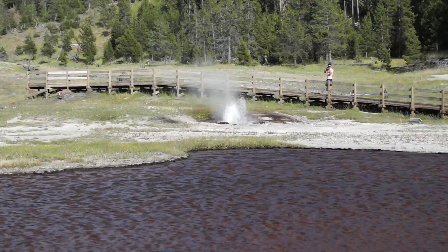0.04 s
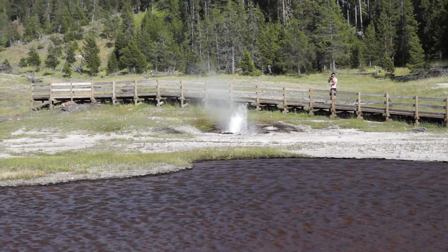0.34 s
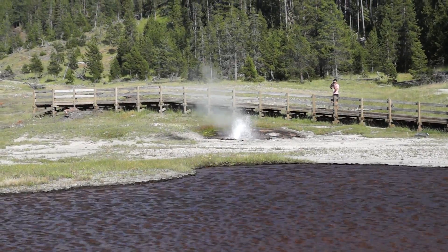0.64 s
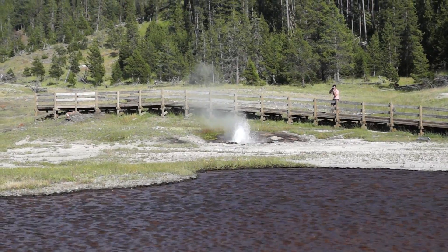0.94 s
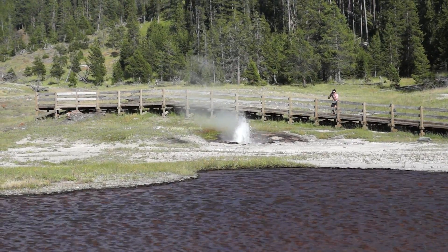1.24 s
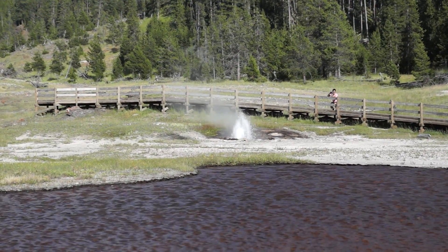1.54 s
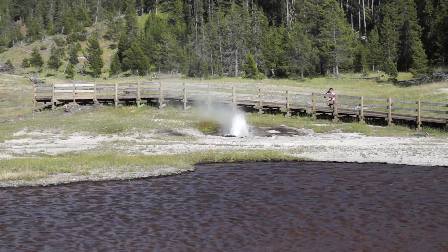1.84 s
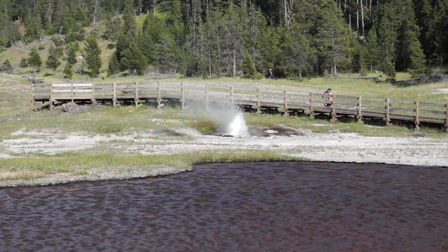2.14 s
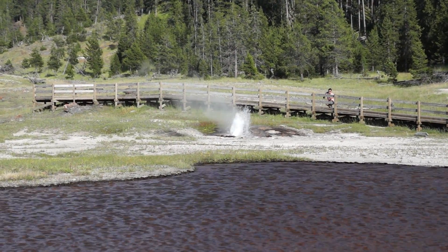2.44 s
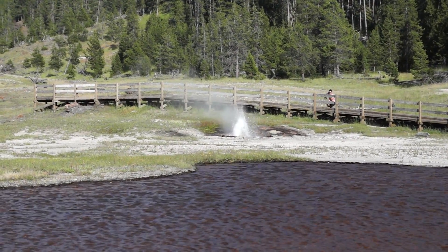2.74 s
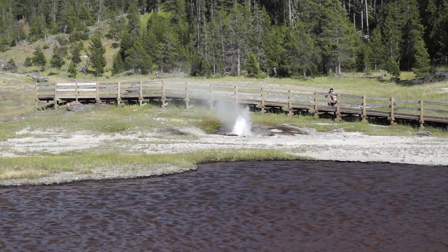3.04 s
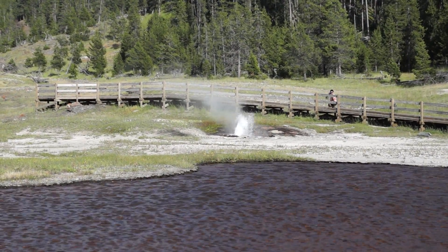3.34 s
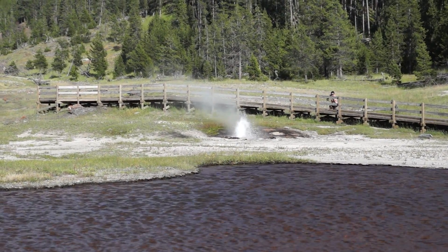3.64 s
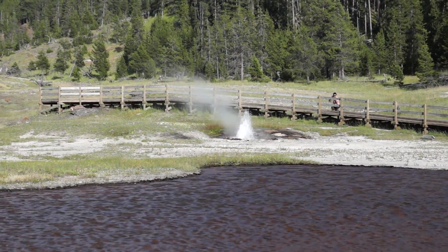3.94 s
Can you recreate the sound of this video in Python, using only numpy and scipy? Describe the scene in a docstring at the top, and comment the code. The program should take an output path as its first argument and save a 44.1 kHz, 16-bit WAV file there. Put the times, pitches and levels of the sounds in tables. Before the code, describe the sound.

Steady far rush of a small spraying geyser, with gusts rumbling on the microphone.

```python
"""A small geyser splashes steadily across a pond: drops patter faintly inside a far rush of spray,
which merges with the wind in the pines. Close by, gusts and small swirls of air buffet the microphone
of a hand-held camera. Two gusts are hard, and after each of them the whole sound is quieter.
The camera body gives two hollow knocks and a few faint ticks."""
import sys
import numpy as np
from scipy import signal
from scipy.io import wavfile
from scipy.ndimage import uniform_filter1d

SR = 44100
rng = np.random.default_rng(int(sys.argv[2]) if len(sys.argv) > 2 else 0)


def inscribe(sig):
    """Save sig as 16-bit PCM at rate SR to the path in sys.argv[1].

    A 1-D sig is mono; a 2-D sig holds one channel per row.
    Samples are clipped to [-1, 1] before scaling.
    """
    pcm = np.round(np.clip(np.atleast_2d(sig).T, -1, 1) * 32767)
    wavfile.write(sys.argv[1], SR, pcm.astype(np.int16))


N = 176400  # 4 seconds

# Faint ticks: (time [s], peak level [dB], pitch [Hz], width to each side [octaves], left over right [dB])
TICKS = [(.453, -42, 5900, .1, 0), (.5185, -35, 5900, .1, -3), (0.518, -31, 13000, 0.16, -7),
         (.765, -37, 13200, .3, -2), (1.753, -26, 2370, 0.17, 2), (1.815, -32, 3270, 0.23, -4),
         (1.899, -34, 3300, 0.18, -4), (1.943, -30.5, 2900, 0.13, -7), (2.069, -34, 5070, 0.16, 0),
         (2.111, -39, 7000, 1.0, 4), (2.16, -34.5, 3380, 0.088, 10), (3.224, -33, 6000, 0.31, 3),
         (3.2625, -24.5, 3170, 0.31, 6), (3.316, -24.5, 2300, 0.34, 9), (3.544, -32, 3400, 0.31, -6)]
# Knocks on the camera body: (time [s], peak level [dB], main pitch [Hz])
KNOCKS = [(0.3367, -17.5, 690), (1.4054, -13, 1150)]
# The tones the body rings with: (pitch [times the main pitch], level [dB], time to fade by 60 dB [s])
BODY_TONES = [(.44, -9, 0.033), (.8, -8, 0.026), (1, 7, 0.019), (1.55, -5, 0.013), (2.7, -27, 0.0078)]

# How hard the wind blows on the microphone: (time [s], level [dB])
WIND_LEVEL = [(.05, -53.5), (.24, -65), (.29, -38), (.38, -57), (.49, -48), (.525, -38), (.58, -48.5),
              (.76, -35), (.86, -38.5), (.91, -29), (.94, -35), (1.0, -32.5), (1.05, -40), (1.25, -58.5),
              (1.93, -55), (1.97, -36.5), (1.995, -21.5), (2.02, -27), (2.055, -19), (2.12, -20.5),
              (2.155, -23.5), (2.22, -23.5), (2.275, -21.5), (2.295, -33.5), (2.45, -38.5), (2.53, -55),
              (2.66, -30.5), (2.69, -39), (2.74, -29.5), (2.81, -31), (2.92, -40), (2.99, -33), (3.06, -50),
              (3.16, -48), (3.216, -30.5), (3.241, -12), (3.295, -19.5), (3.336, -10), (3.37, -14.5),
              (3.51, -23.5), (3.545, -27), (3.63, -29), (3.66, -38), (3.72, -50.5), (4.0, -52)]
# The rumble of a light breeze: (frequency [Hz], relative level [dB])
BREEZE_SPECTRUM = [(25, -37), (60, -16), (110, -2.5), (200, -0.5), (320, -3.5), (550, -12.5), (1000, -15.5),
                   (3000, -55)]
# The brighter sound of a hard gust: (frequency [Hz], relative level [dB])
GUST_SPECTRUM = [(25, -37), (60, -27.5), (115, -14), (250, -4.5), (400, -7.5), (600, -15.5), (1060, -27.5),
                 (1500, -31.5), (2400, -44), (4500, -54)]
# How alike the wind is on the left and right: (frequency [Hz], likeness [-1 to 1])
WIND_LIKENESS = [(60, 0.85), (130, 0.88), (290, 0.62), (640, 0.28), (1400, -0.36)]
# Swirls of air: (time [s], level at the crest [dB], pitch [Hz], width to each side [octaves], length [s])
SWIRLS = [(.912, -25, 235, 0.83, 0.023), (.960, -25.5, 242, 0.48, 0.019), (.991, -23, 215, 0.96, 0.024),
          (1.992, -13.5, 113, 1.74, 0.0085), (2.113, -18, 305, 1, 0.028), (2.180, -16.5, 302, 0.62, 0.017),
          (2.214, -12, 243, 0.97, 0.014), (2.237, -16.5, 356, 0.78, 0.025), (2.266, -15, 270, 0.75, 0.018),
          (2.282, -13, 300, 0.73, 0.0079), (2.797, -27.5, 218, .7, 0.013), (3.195, -31.5, 237, 0.88, 0.022),
          (3.231, -15.5, 380, 0.48, 0.011), (3.243, -14, 220, 1.2, 0.017), (3.315, -6, 375, .9, 0.01),
          (3.323, -11, 226, 1.13, 0.008), (3.383, -11.5, 360, 0.92, .016),
          (3.452, -15.5, 335, 1.27, 0.0097), (3.479, -12.5, 370, 0.74, 0.017), (3.505, -13, 320, 0.9, .013),
          (3.523, -14, 310, 0.6, .014), (3.584, -22, 261, 0.86, 0.014), (3.625, -16.5, 285, 0.74, 0.016)]

# The rush of the geyser and the pines: (frequency [Hz], relative level [dB])
RUSH_SPECTRUM = [(30, -48), (60, -27), (110, -7), (190, -9.5), (238, 4), (280, -8), (325, 7.5), (375, -7.5),
                 (430, 1), (490, 0), (590, -2.5), (780, -.5), (1080, 3.5), (1300, -4), (1550, -8.5),
                 (1850, -4.5), (2200, -7), (2600, -12), (3300, -16), (4500, -19.5), (6300, -24.5),
                 (8200, -26.5), (10000, -30), (13500, -32.5), (15800, -34.5)]
# How alike the rush is on the left and right: (frequency [Hz], likeness [-1 to 1])
RUSH_LIKENESS = [(100, 0.98), (330, 0.92), (700, 0.79), (1050, 0.81), (1550, 0.32), (2050, 0.88),
                 (2700, .66), (3400, 0.19), (4500, .46), (5800, 0.13), (15000, 0)]
# How far the rush leans to the left: (frequency [Hz], left over right [dB])
RUSH_LEAN = [(130, -2), (300, 1.5), (640, 2), (1200, .3), (3100, 0), (5500, 2.5), (8200, 5), (12000, .8)]

# Sudden drops that creep back, applied on top of all other levels: (time [s], level change [dB])
LEVEL_DROPS = [(2.115, 0), (2.12, -4), (2.17, -2.6), (3.24, -1.2), (3.25, -5.4), (3.33, -6.1), (3.345, -10),
               (3.44, -4.7), (4.0, -3.6)]


def from_db(db):
    """Turn decibels into a number to multiply a sound by."""
    return 10 ** (np.asarray(db) / 20)


def rms_one(x):
    """Scale a signal so that its average strength (rms) is 1."""
    return x / np.sqrt(np.mean(x ** 2) + 1e-20)


def at_hz(table, hz):
    """Read a table at any frequency, with octaves evenly spaced."""
    freqs, values = np.transpose(table)
    return np.interp(np.log(hz), np.log(freqs), values)


def pan(lean_db):
    """Left and right gains; a positive lean makes the left louder."""
    return from_db(np.array([[.5], [-.5]]) * lean_db)


def drift(rate_hz):
    """A smooth random wander, about 1 in size; a higher rate wanders faster."""
    step = 40  # samples between random values
    r = np.exp(-2 * np.pi * rate_hz * step / SR)
    slow = signal.lfilter([1], [1, -2 * r, r * r], rng.standard_normal(N // step + 2002))[2000:]
    return np.interp(np.arange(N) / step, np.arange(len(slow)), rms_one(slow))


def band(x, low_hz, high_hz, order=2):
    """Keep the part of a sound between two frequencies."""
    sos = signal.butter(order, [low_hz, min(high_hz, .45 * SR)], "band", fs=SR, output="sos")
    return signal.sosfilt(sos, x)


def around(x, hz, octaves, order=2):
    """Keep the part of a sound within some octaves of a pitch."""
    reach = 2 ** octaves
    return band(x, hz / reach, hz * reach, order)


def ring(clicks, hz, fade_s):
    """Each click starts a tone that fades by 60 dB in fade_s."""
    r = np.exp(-np.log(1000) / (fade_s * SR))
    angle = 2 * np.pi * hz / SR
    return signal.lfilter([0, np.sin(angle)], [1, -2 * r * np.cos(angle), r * r], clicks + 1e-18)


def add(out, time_s, peak_db, sound):
    """Mix a short sound in at a time and peak level."""
    start = int(time_s * SR)
    scaled = from_db(peak_db) * sound / np.abs(sound).max()
    out[:, start:start + sound.shape[-1]] += scaled[..., :N - start]


def noise_bands(edges_hz, likeness):
    """Give the centre frequency and stereo noise of each band in turn."""
    white = rng.standard_normal((2, 2, N))
    for k, (low, high) in enumerate(zip(edges_hz, edges_hz[1:])):
        shared, side = band(white[k % 2], low, high, order=3)
        hz = np.sqrt(low * high)
        alike = at_hz(likeness, hz)
        yield hz, np.sqrt(1 + alike) * shared + np.sqrt(1 - alike) * np.array([side, -side])


def knocks_and_ticks(fade_s=.007, snap_db=-14.5, snap_pitch_ratio=2.2):
    """A fingertip makes the camera body ring, with a dry snap; ticks are tiny bursts of noise."""
    out = np.zeros((2, N))
    click = signal.unit_impulse(SR // 10)
    fade = np.exp(-np.log(1000) * np.arange(len(click)) / SR / fade_s)
    for time_s, db, hz in KNOCKS:
        body = sum(from_db(tone_db) * ring(click, hz * ratio, ring_s)
                   for ratio, tone_db, ring_s in BODY_TONES)
        add(out, time_s, db, band(body, 420, 2300, order=3))  # the range a soft fingertip sets ringing
        burst = rng.standard_normal(len(click)) * fade
        add(out, time_s, db + snap_db, around(burst, hz * snap_pitch_ratio, octaves=.63, order=3))
    for time_s, db, hz, octaves, lean_db in TICKS:
        burst = rng.standard_normal((2, len(click))) * fade
        add(out, time_s, db, pan(lean_db) * around(burst, hz, octaves))
    return out


def wind(breeze_db=-29.5, gust_db=-22, lumpy_db=2.5, smooth_s=.0294, trim_db=-.26):
    """Rough air on the microphone: a lumpy rumble, brighter the harder it blows."""
    level_db = np.interp(np.arange(N) / SR, *np.transpose(WIND_LEVEL))
    force = np.clip((level_db - breeze_db) / (gust_db - breeze_db), 0, 1)  # 0 is breeze, 1 is gust
    rumble = np.zeros((2, N))
    for hz, noise in noise_bands(np.geomspace(20, 4500, 17), WIND_LIKENESS):
        band_db = force * at_hz(GUST_SPECTRUM, hz) + (1 - force) * at_hz(BREEZE_SPECTRUM, hz)
        rumble += noise * from_db(band_db)
    rumble *= from_db(lumpy_db * drift(rate_hz=45))
    # Even out slow swells, so that the table shapes the gusts and only quick lumps stay.
    power = uniform_filter1d(np.mean(rumble ** 2, axis=0), int(smooth_s * SR))
    return rumble / np.sqrt(power + 1e-18) * from_db(level_db + trim_db)


def swirls(side_gain=.78):
    """Each swirl of air hits the microphone as a short puff, partly different left and right."""
    out = np.zeros((2, N))
    t = np.arange(SR // 5) / SR
    for time_s, db, hz, octaves, length_s in SWIRLS:
        swell = np.cos(np.pi * np.clip((t - t.mean()) / length_s, -.5, .5))
        noises = around(rng.standard_normal((2, len(t))), hz, octaves, order=3)
        shared, side = (rms_one(swell * noise) for noise in noises)
        puff = rms_one(shared + side_gain * np.array([side, -side]))
        puff *= np.sqrt(length_s / t[-1] / 2)  # strength about 1 at the crest
        start = int((time_s - t.mean()) * SR)
        out[:, start:start + len(t)] += from_db(db) * puff[:, :N - start]
    return out


def geyser_splashes(drops_per_s=160, level_db=-53.5, spread_db=3.0, ring_cycles=9.4):
    """Falling water patters: each drop rings very briefly at a random pitch."""
    pitches = np.geomspace(800, 4200, 16)
    sizes = from_db(spread_db * np.minimum(rng.exponential(1, N), 4))  # many small, a few large
    signs = rng.choice([-1, 1], N)
    drops = sizes * signs * (rng.random(N) < drops_per_s / SR)
    which_pitch = rng.integers(0, len(pitches), N)
    patter = sum(ring(drops * (which_pitch == k), hz, ring_cycles / hz) / np.sqrt(hz)
                 for k, hz in enumerate(pitches))
    return from_db(level_db) * rms_one(patter)


def geyser_rush(level_db=-38, surge_db=.58, flicker_db=.73, left_lag_s=2.4e-5):
    """Far spray and wind in the pines blend into a smooth noise that surges a little."""
    edges_hz = np.r_[25, 50, 80, 115, np.geomspace(165, 17000, 36)]
    surge = surge_db * drift(rate_hz=13)  # all bands surge together
    rush = np.zeros((2, N))
    for hz, noise in noise_bands(edges_hz, RUSH_LIKENESS):
        flicker = flicker_db * drift(rate_hz=33)  # each band flickers on its own
        rush += noise * pan(at_hz(RUSH_LEAN, hz)) * from_db(at_hz(RUSH_SPECTRUM, hz) + surge + flicker)
    t = np.arange(N) / SR
    rush[0] = np.interp(t - left_lag_s, t, rush[0])  # the sound reaches the right side first
    return from_db(level_db) * rms_one(rush)


def scene():
    """The far geyser, with the close wind, knocks and ticks on top."""
    return geyser_rush() + geyser_splashes() + wind() + swirls() + knocks_and_ticks()


def record(dry, start_s=.044, fade_in_s=.018, cutoff_hz=15850):
    """The sound fades in, its level drops at the two hard gusts, and the highest treble is cut."""
    t = np.arange(N) / SR
    fade_in = np.clip((t - start_s) / fade_in_s, 0, 1)
    gain = from_db(np.interp(t, *np.transpose(LEVEL_DROPS)))
    treble_cut = signal.ellip(12, .1, 80, cutoff_hz, fs=SR, output="sos")
    return signal.sosfilt(treble_cut, dry * gain * fade_in)


dry = scene()
out = record(dry)
inscribe(out)
```